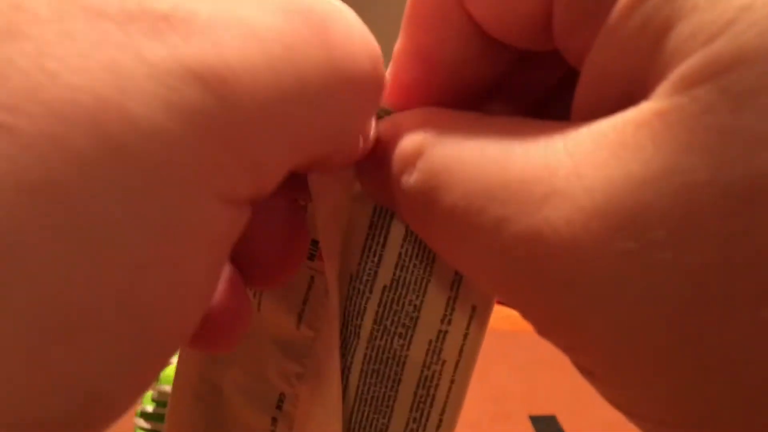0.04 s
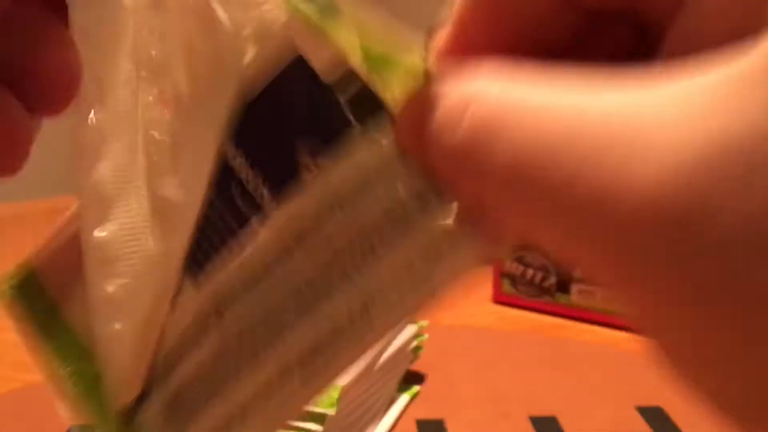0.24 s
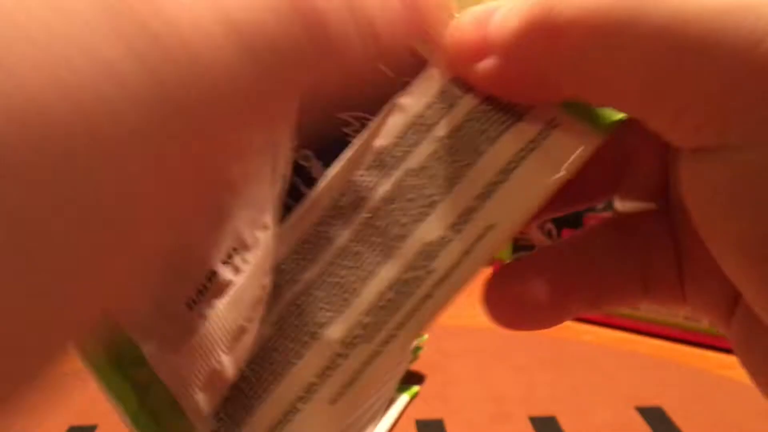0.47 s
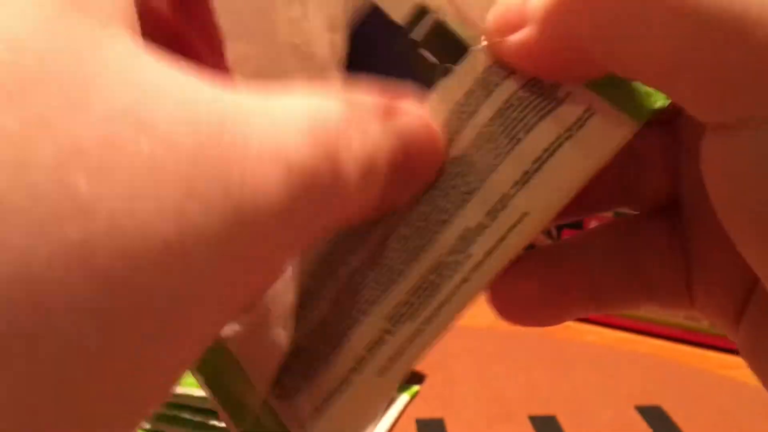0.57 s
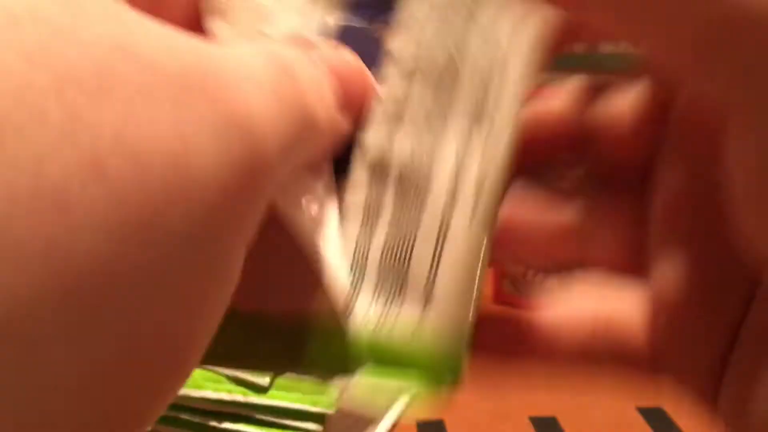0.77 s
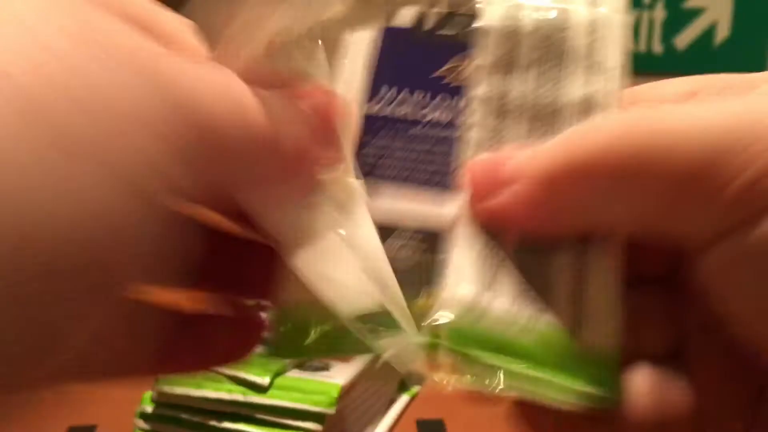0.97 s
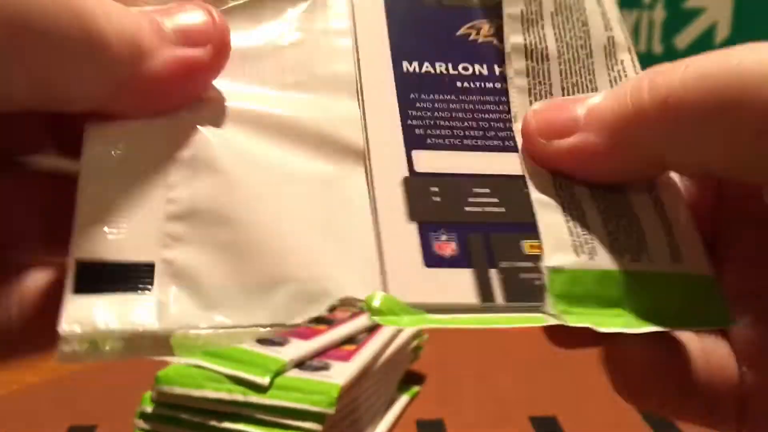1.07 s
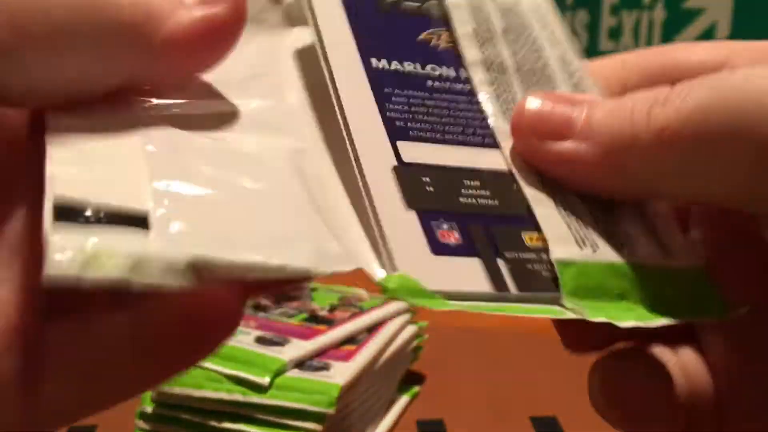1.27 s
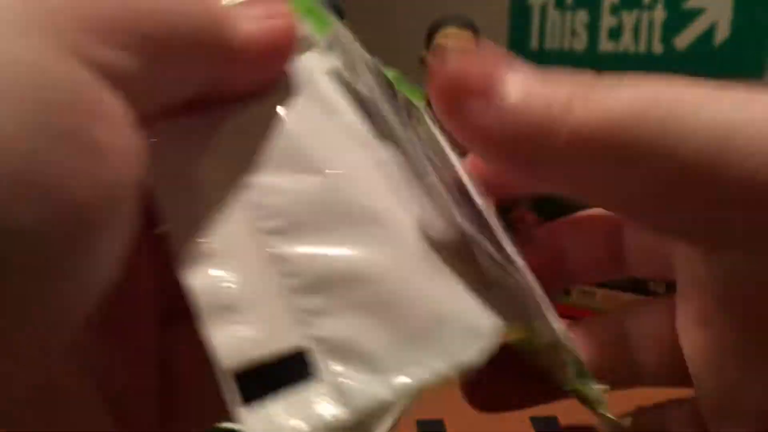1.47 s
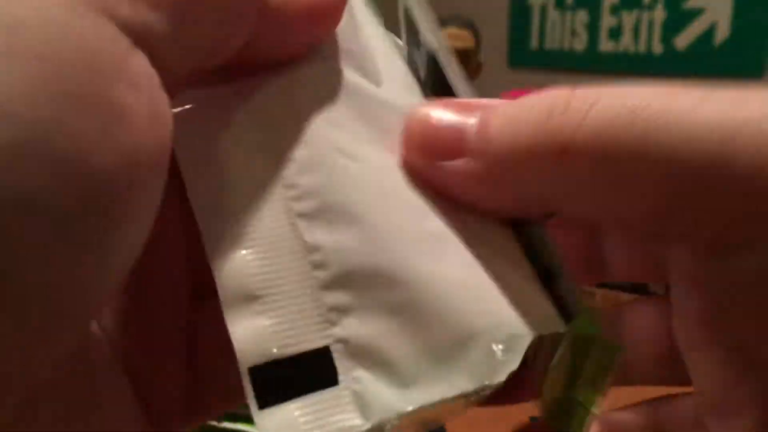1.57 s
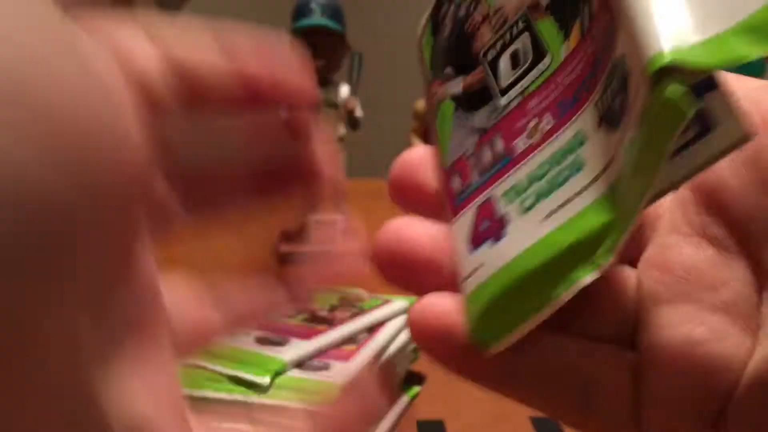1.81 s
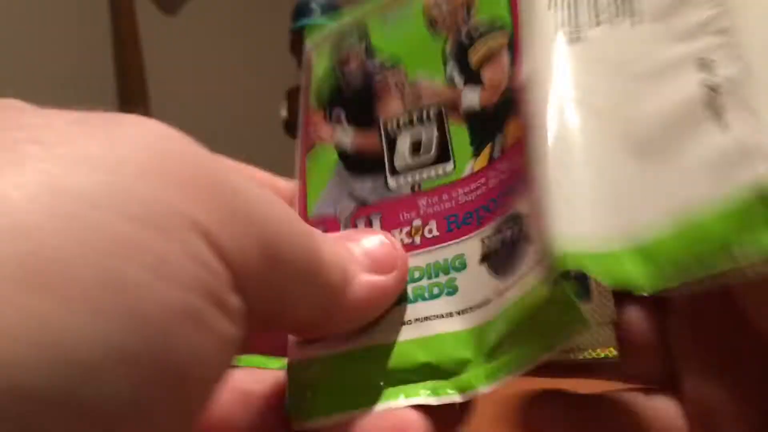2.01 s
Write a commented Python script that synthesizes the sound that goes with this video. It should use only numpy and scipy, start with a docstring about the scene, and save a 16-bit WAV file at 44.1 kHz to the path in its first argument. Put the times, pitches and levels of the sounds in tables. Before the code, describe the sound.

Foil rips and crinkles as hands open a pack of cards indoors. Two brief, bright tears come about a second apart, each followed by close snapping and rustling as the wrapper peels back, with a few dull bumps.

```python
"""At a table in a small room, close to a small microphone, two hands rip a foil card wrapper open in two
pulls and peel it off the cards. Each fold that buckles gives a snap of a millisecond or two; the tearing
seam is a dense run of such snaps. Foil slides and crackles in between, the hands bump the pack,
the table and the room answer, and the loudest peaks overload the recorder."""
import sys
import numpy as np
from scipy import signal
from scipy.fft import rfft, irfft
from scipy.io import wavfile
from scipy.ndimage import uniform_filter1d

SR = 44100
rng = np.random.default_rng(int(sys.argv[2]) if len(sys.argv) > 2 else 0)


def wav_out(sig):
    """Save sig, one row per channel (or a flat mono array), as 16-bit PCM at SR to the path in sys.argv[1]."""
    wavfile.write(sys.argv[1], SR, np.round(np.clip(np.atleast_2d(sig).T, -1, 1) * 32767).astype(np.int16))


N = 90404
TIME_S = np.arange(N) / SR
TOP_HZ = 15900  # upper limit of the recorder


def undb(db):
    return 10 ** (np.asarray(db) / 20)


def unit(x):
    return x / np.sqrt(np.mean(x ** 2) + 1e-18)


def one_ms(x):
    """Scale a burst to the energy of one millisecond at rms 1."""
    return x / np.sqrt(np.sum(x ** 2) / (SR / 1000))


def band(x, lo_hz, hi_hz, order=2):
    edges_hz = [lo_hz, min(hi_hz, SR / 2 - 100)]
    return signal.sosfilt(signal.butter(order, edges_hz, "band", fs=SR, output="sos"), x)


def colour(x, points):
    """Shape a sound by (Hz, dB) points, rolling off below the first; rms 1."""
    hz, db = np.array(points).T
    f = np.maximum(np.arange(N // 2 + 1) * SR / N, 1)
    gain = undb(np.interp(np.log(f), np.log(hz), db)) * np.minimum(f / hz[0], 1) ** 2
    return unit(irfft(rfft(x) * gain, N))


def curve(rows, column=1):
    """Gain over time from a column of dB points, silent outside them."""
    times, db = np.array(rows).T[[0, column]]
    return undb(np.interp(TIME_S, times, db)) * (TIME_S >= times[0]) * (TIME_S <= times[-1])


def add(out, start_s, x):
    i = max(int(start_s * SR), 0)
    out[i:i + len(x)] += x[:max(N - i, 0)]


def crackle(per_s, scatter_db, steady_samples, decay_s=0.00086, band_scatter_db=4):
    """Tiny foil snaps, each of its own size and colour, their level evened out over `steady_samples`."""
    hits = rng.random(N) < per_s / SR
    strength = hits * undb(scatter_db * np.minimum(rng.exponential(size=N), 4))
    edges_hz = [60, *np.geomspace(1200, 20000, 7)]
    out = 0
    for lo_hz, hi_hz in zip(edges_hz, edges_hz[1:]):
        kicks = strength * undb(band_scatter_db * rng.standard_normal(N))
        power = signal.lfilter([1], [1, -np.exp(-2 / (decay_s * SR))], kicks ** 2)
        envelope = np.sqrt(power / (uniform_filter1d(power, size=steady_samples) + 1e-9))
        out = out + band(envelope * rng.standard_normal(N), lo_hz, hi_hz)
    return out


# Spectrum of the background at the microphone: frequency_hz, level_db
ROOM_TONE = [(50, 0.5), (150, -10), (500, -20), (16000, -43)]


def room_tone(level_db=-54):
    """A faint, steady low noise under everything."""
    return undb(level_db) * colour(rng.standard_normal(N), ROOM_TONE)


# Foil sliding on cards and fingers, close to the microphone: time_s, level_db
SLIDE_LEVELS = [(0, -42), (.08, -48.5), (.19, -48), (.28, -21), (.38, -41), (.445, -37), (.492, -25),
                (.55, -41), (.645, -35.5), (.68, -42.5), (.715, -33), (.78, -31.5), (.835, -44.5),
                (.868, -52), (.89, -36), (.945, -39.5), (.995, -29.5), (1.11, -26), (1.205, -87),
                (1.262, -28), (1.295, -42.5), (1.36, -43), (1.395, -24.5), (1.45, -44), (1.565, -43.5),
                (1.65, -31.5), (1.705, -38.5), (1.735, -29), (1.795, -41.5), (1.845, -35.5), (1.89, -39.5),
                (2.05, -37)]
# Spectrum of the sliding foil: frequency_hz, level_db
SLIDE_SPECTRUM = [(120, -6.5), (200, 3.5), (623, -7.5), (1300, -3.5), (2800, -3), (4200, -6), (5840, -5),
                  (16000, -3.3)]


def sliding(crackle_db=4, hiss_db=-4.5):
    """Foil rubs along with a hiss, crackling more the harder it is pressed."""
    pressure = curve(SLIDE_LEVELS)
    ticks = colour(crackle(per_s=750, scatter_db=4.5, steady_samples=1800), SLIDE_SPECTRUM)
    hiss = colour(rng.standard_normal(N), SLIDE_SPECTRUM)
    tick_gain = undb(crackle_db) * np.sqrt(pressure / pressure.max())
    return pressure * (tick_gain * ticks + undb(hiss_db) * hiss)


# Folds buckling, heard up close: start_s, mid_level_db, low_re_mid_db, treble_re_mid_db, ring_hz
FOLD_SNAPS = [(0.0536, -19.5, -21.5, 8, 6060), (0.2014, -33.5, -12, -2, 4500),
              (0.2248, 0.5, -13.5, 2.5, 3880), (0.3091, 2.5, -8, -6, 2760), (0.3539, -12.5, -15, -1, 3670),
              (0.359, -13, -5, -4, 5700), (0.372, -12.5, -3.5, 3, 1580), (0.377, -11, -3.5, 1.5, 6030),
              (0.402, -23.5, -7, -3, 6460), (0.4614, -12.5, -9.5, 3, 4470), (0.4656, -14.5, -5.5, 5, 2680),
              (0.4805, -20, -23, -6, 2580), (0.4994, -21, -3, 5.5, 4290), (0.5485, -13.5, -15.5, 8, 3500),
              (0.5801, -18, -8, 7, 2730), (0.5987, -19.5, -8, 1.5, 4450), (0.6238, -18.5, -18, -1, 3180),
              (0.6946, -16.5, -23, -6, 6600), (0.7139, -15, -38, -2, 3560), (0.728, -10.5, -5, -2, 2620),
              (0.7426, -11.5, -9.5, -14, 3770), (0.7518, -14, -30, 9.5, 2440), (0.7795, -12, -11, -7, 2400),
              (0.784, -13, -14, 6, 3760), (0.791, -17.5, -13, 1, 2370), (0.8086, -16, -6.5, 0.5, 6360),
              (0.877, -11.5, -9.5, 7, 6900), (0.9007, -19, -6, 1, 6100), (0.9109, -14.5, -19, -19, 8250),
              (0.925, -19, -14, 1.5, 5400), (0.9625, -17.5, -8, -4, 3340), (0.9878, -9.5, -11.5, 0.5, 6050),
              (1.005, -5, -9.5, 3, 5460), (1.0175, -6, -2, 10.5, 2800), (1.0219, -7, -28, -8, 6050),
              (1.1196, -12, -22, -13, 6200), (1.1332, -8.5, -13, -3.5, 5760),
              (1.1921, -27, -1.5, 0.5, 3280), (1.2326, -17.5, -9.5, -12, 2480),
              (1.245, -15, -3.5, -3, 2420), (1.3785, -5.5, -11, -0.5, 2700),
              (1.3842, -4.5, -9.5, 3.5, 2560), (1.394, -3, -11.5, -1.5, 2410),
              (1.3983, -12.5, -14, 9.5, 7760), (1.4241, -14.5, -11, -10, 3360), (1.4306, -21, -5, -2, 3380),
              (1.5268, -7, -16.5, 4, 2100), (1.5797, -5.5, -11, -6.5, 3590), (1.612, -21.5, -8, -2, 5260),
              (1.617, -13, -11, -11, 2320), (1.6373, -9.5, -23, -3, 3960), (1.6839, -10, -25, 1.5, 7400),
              (1.688, -13.5, -9.5, 3, 6700), (1.7217, -6.5, -13, 0.5, 6170), (1.731, -15.5, -8, -7, 3070),
              (1.7357, -10.5, -12, 2, 5850), (1.7542, -12, -11.5, 3.5, 4030), (1.7591, -6, -13, 0, 3400),
              (1.8362, -18, 0.5, -8, 5750), (1.842, -21.5, 2.5, -22, 4420), (1.9691, -24, -4, -1, 3340)]
# Whole panels of foil flipping over: start_s, level_db, pitch_hz
PANEL_POPS = [(0.0532, -17.5, 3720), (0.3093, -5.5, 946), (0.5801, -11, 3500), (0.877, -16, 2220),
              (1.5263, -16, 740)]


def folds(low_decay_s=0.0025, mid_decay_s=0.0016, treble_decay_s=0.0011, pop_decay_s=0.0012):
    """A buckling fold snaps in three ranges and briefly rings its facet; a flipping panel pops."""
    out, t = np.zeros(N), np.arange(SR // 50) / SR

    def ring(hz, decay_s):
        return one_ms(band(np.sin(2 * np.pi * hz * t) * np.exp(-t / decay_s), hz / 2, hz * 2))

    for start_s, db, low_db, treble_db, hz in FOLD_SNAPS:
        noise = np.sign(rng.standard_normal((3, len(t))))
        low = one_ms(band(noise[0] * np.exp(-t / low_decay_s), 596, 2220))
        mid = one_ms(band(noise[1] * np.exp(-t / mid_decay_s), 2220, 8230, order=3))
        treble = one_ms(band(noise[2] * np.exp(-t / treble_decay_s), 8230, TOP_HZ + 1000, order=3))
        facet = one_ms(mid + 1.05 * ring(hz, decay_s=2.2 / hz))
        add(out, start_s, undb(db) * (undb(low_db) * low + facet + undb(treble_db) * treble))
    for start_s, db, hz in PANEL_POPS:
        add(out, start_s, undb(db) * ring(hz, pop_decay_s))
    return out


# Hands bumping and flexing the pack near the microphone: start_s, level_db, decay_s
HAND_BUMPS = [(0.221, -16, 0.011), (0.292, -24.5, 0.014), (0.485, -30, 0.02), (0.601, -35.5, 0.024),
              (.727, -48.5, 0.23), (.953, -36, 0.041), (1.015, -37, 0.056), (1.089, -15, 0.013),
              (1.242, -31.5, 0.016), (1.387, -34, 0.027), (1.577, -34.5, 0.021), (1.75, -31, 0.023),
              (1.834, -39, 0.076), (1.856, -27.5, 0.0043)]
# The low ranges of a thud: low_hz, high_hz, level_db
THUD_BANDS = [(52.6, 110, -3), (96, 188, -1), (207, 384, -4)]


def bumps(attack_s=0.003):
    """Hands knock the pack: dull thuds of low noise that rise fast and die away."""
    power, thud = 0, 0
    for start_s, db, decay_s in HAND_BUMPS:
        age = np.maximum(TIME_S - start_s, 0)
        rise = np.minimum(age / attack_s, 1)
        fall = np.exp(-np.maximum(age - attack_s, 0) / decay_s)
        power = power + (undb(db) * rise * fall) ** 2
    for lo_hz, hi_hz, db in THUD_BANDS:
        rumble = band(rng.standard_normal(N), lo_hz, hi_hz)
        local_rms = np.sqrt(uniform_filter1d(np.abs(signal.hilbert(rumble)) ** 2 / 2, size=500))
        thud = thud + undb(db) * rumble / local_rms
    return band(np.sqrt(power) * thud, 55, 1000)


# The seam tearing at close range, one list for each pull: time_s, treble_db, body_db
PULLS = [
    [(.2235, -63, -47), (.226, -4.5, -10.5), (.236, -8, -17), (.246, -12, -30), (.251, -4, -18.5),
     (.275, -5.5, -21), (.294, -4.5, -5.5), (.302, -3, -11), (.307, -19, -21), (.319, -20, -29),
     (.324, -22, -40)],
    [(1.026, -12, -29), (1.029, -5, -15.5), (1.069, -5, -12), (1.077, -16, -27), (1.083, -16, -12),
     (1.097, -5, -9.5), (1.108, -14, -18), (1.114, -32, -40)],
]
# Spectrum of the seam's snaps: frequency_hz, level_db
SEAM_SPECTRUM = [(88, -35), (150, -5), (376, -5), (1560, -1), (2810, 0), (4860, -7), (14500, -3.5),
                 (16000, -4.5)]
# Resonances of the taut wrapper: centre_hz, width_hz, gain
WRAPPER_MODES = [(1030, 210, 0.69), (1570, 190, 0.82), (3550, 270, 0.71), (6240, 820, 1)]


def rips(split_hz=3280):
    """The seam gives way in dense snaps that ring the taut wrapper; body and treble swell separately."""
    snaps = colour(crackle(per_s=1400, scatter_db=3, steady_samples=300), SEAM_SPECTRUM)
    ringing = sum(gain * band(snaps, hz - width / 2, hz + width / 2, order=1)
                  for hz, width, gain in WRAPPER_MODES)
    tear = snaps + ringing
    body = unit(band(tear, 207, split_hz, order=3))
    treble = unit(band(tear, split_hz, TOP_HZ + 1000, order=3))
    return sum(treble * curve(pull, column=1) + body * curve(pull, column=2) for pull in PULLS)


# The foil's edge scraping, close by: start_s, length_s, level_db
EDGE_SCRAPES = [(0.343, 0.0064, -24), (0.511, 0.0081, -25), (0.602, 0.0053, -22), (1.481, 0.018, -25),
                (1.922, 0.076, -35)]


def scrapes():
    """The edge of the foil scrapes in short swells of bright hiss."""
    hiss = unit(band(rng.standard_normal(N), 3700, TOP_HZ, order=1))
    out = np.zeros(N)
    for start_s, length_s, db in EDGE_SCRAPES:
        progress = np.clip((TIME_S - start_s) / length_s, 0, 1)
        out += undb(db) * hiss * np.sin(np.pi * progress)
    return out


def room(x, delay_s=0.0075, table_decay_s=0.0018, table_db=-23, t60_s=0.32, tail_db=-26):
    """The microphone hears the direct sound, a scattered echo off the table and the room's short tail."""
    t = np.arange(SR // 2) / SR
    age = np.maximum(t - delay_s, 0)
    noise = rng.standard_normal((2, len(t))) * (t > delay_s)
    table = band(noise[0] * np.exp(-age / table_decay_s), 160, 7200, order=1)
    tail = band(noise[1] * undb(-60 * age / t60_s), 160, 7200, order=1)
    echo = (undb(table_db) * unit(table) + undb(tail_db) * unit(tail)) / np.sqrt(len(t))
    return x + signal.fftconvolve(x, echo)[:N]


def scene():
    """The wrapper and the hands in the small room, on one channel."""
    background = room_tone()
    handling = folds() + rips() + sliding() + scrapes() + bumps()
    return (background + room(handling))[None]


def record(dry):
    """The recorder flattens the loudest peaks and cuts the top."""
    ceiling = 0.8
    flattened = dry / (1 + (dry / ceiling) ** 4) ** (1 / 4)
    return signal.sosfilt(signal.ellip(8, .2, 70, TOP_HZ, fs=SR, output="sos"), flattened)


dry = scene()
out = record(dry)
wav_out(out)
```